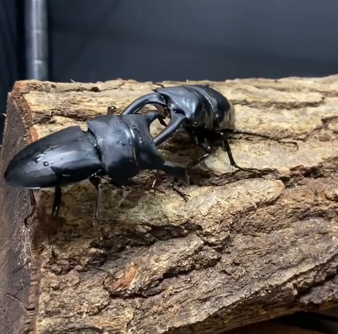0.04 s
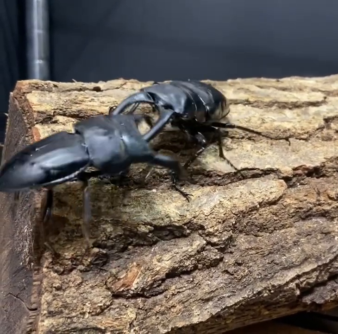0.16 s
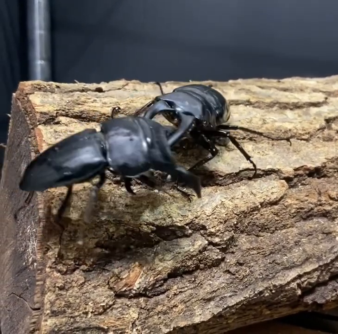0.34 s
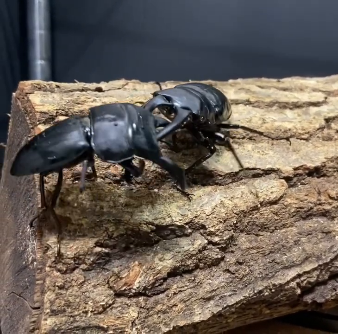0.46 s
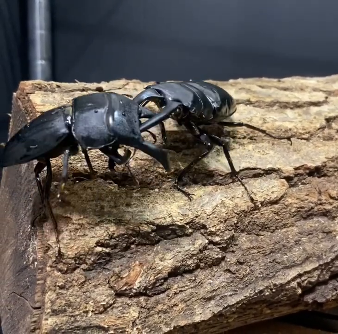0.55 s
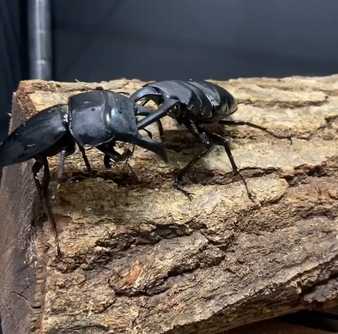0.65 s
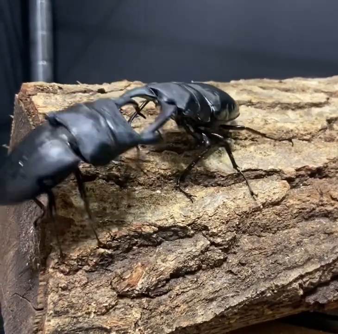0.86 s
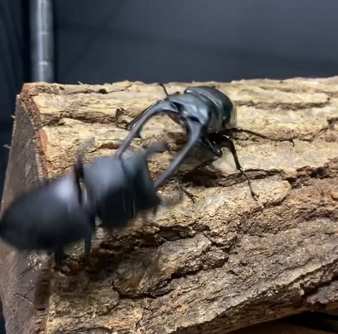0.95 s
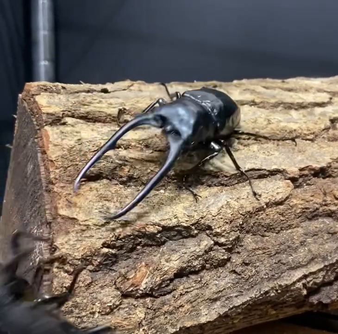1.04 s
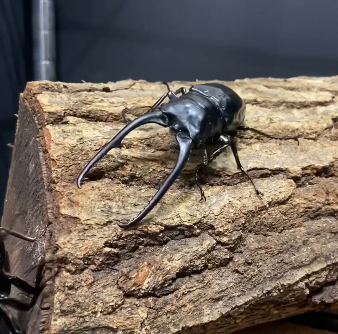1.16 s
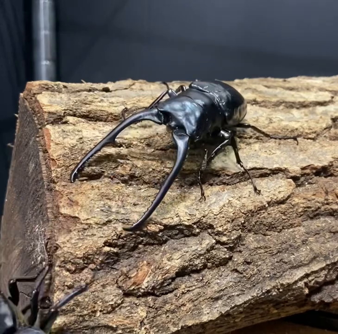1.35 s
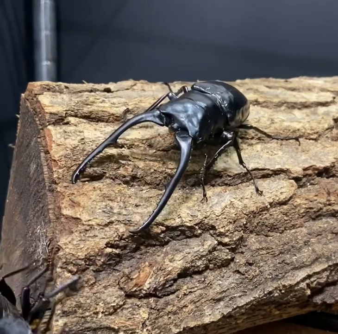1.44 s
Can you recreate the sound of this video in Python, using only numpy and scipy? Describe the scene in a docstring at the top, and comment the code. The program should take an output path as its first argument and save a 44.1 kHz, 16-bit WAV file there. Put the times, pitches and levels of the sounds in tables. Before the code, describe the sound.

Tiny dry clicks and scratches come from two large beetles wrestling on a log. One sharper snap early on gives way to scraping, then small hollow knocks and dull rubbing, close to the microphone in a quiet, faintly rumbling room.

```python
"""Tiny dry clicks over a low room rumble: two large stag beetles wrestle on a log in a quiet room,
close to a stereo microphone pair. Claws and jaws snap on the bark in bursts of fractures and scrape
across it, sticking and slipping, and bodies rub dully on the log. One beetle is thrown off and knocks
against the wood on its way down. The small room adds a short tail to every contact."""
import sys
import numpy as np
from scipy import signal
from scipy.fft import rfft, irfft, next_fast_len
from scipy.io import wavfile

SR = 44100
rng = np.random.default_rng(int(sys.argv[2]) if len(sys.argv) > 2 else 0)


def persist_wave(psi):
    """Save psi, clipped to +-1, as 16-bit WAV."""
    counts = np.round(np.clip(psi, -1, 1) * 32767).astype(np.int16)
    wavfile.write(sys.argv[1], SR, np.atleast_2d(counts).T)


N = 66150


def amp(db):
    """Decibels to gain."""
    return 10 ** (np.asarray(db) / 20)


def unit(x):
    """Scales to rms 1."""
    return x / np.sqrt(np.mean(x ** 2) + 1e-30)


def read(points, hz):
    """Reads a table on a log-frequency axis."""
    freqs, values = np.transpose(points)
    return np.interp(np.log(hz + 1), np.log(freqs + 1), values)


def add(mix, start_s, sound):
    """Adds a sound into the mix at its start time."""
    part = mix[max(round(start_s * SR), 0):][:len(sound)]
    part += sound[:len(part)]


def colour(x, points, size=2048):
    """Minimum-phase filter with the given spectrum: nothing rings ahead of an attack."""
    hz = abs(np.fft.fftfreq(size, 1 / SR))
    log_gain = np.log(amp(read(points, hz)))
    taps = np.fft.ifft(np.exp(np.conj(signal.hilbert(log_gain)))).real
    return signal.fftconvolve(x, taps[:size // 2])


def diffuse(pair):
    """Makes two unrelated signals as alike as diffuse sound is at the two microphones."""
    # Likeness of left and right: freq_hz, coherence
    likeness = [(60, .995), (130, .95), (300, .55), (700, .1), (4500, .15), (7000, .9), (16000, .85)]
    size = pair.shape[1]
    left, other = rfft(pair)
    coherence = read(likeness, np.fft.rfftfreq(size, 1 / SR))
    right = coherence * left + np.sqrt(1 - coherence ** 2) * other
    return irfft(np.array([left, right]), size)


def room_tone(rumble_db=-59.5):
    """Low rumble from all round the room, with a faint hum in it."""
    # Spectrum of the rumble: freq_hz, relative_db
    rumble_shape = [(18, -45), (32, -10.5), (48, -4), (80, 1), (120, -3.5), (165, -15.5), (270, -18.5),
                    (400, -30), (800, -36), (2000, -42.5), (5000, -44.5), (9000, -51.5), (16000, -54)]
    # Steady tones of the hum: pitch_hz, level_db
    hum_tones = [(80, -70), (98, -68), (120, -69)]
    gain = amp(read(rumble_shape, np.fft.rfftfreq(N, 1 / SR)))
    rumble = irfft(rfft(rng.standard_normal((2, N))) * gain, N)
    t = np.arange(N) / SR
    hum = sum(amp(db) * np.sqrt(2) * np.sin(2 * np.pi * (hz * t + rng.random())) for hz, db in hum_tones)
    return amp(rumble_db) * unit(diffuse(rumble)) + hum


def bark(drives, span_s, db, body_db, treble_db):
    """Bark fractures: a dry crack at db (rms over the span), with woody body and treble relative to it."""
    # Spectra of the three parts of a fracture: freq_hz, gain_db
    body = [(100, -26.5), (300, -9.5), (700, -6), (1200, -5), (1700, -1), (2350, 2.5), (3100, -4),
            (4500, -24.5), (9000, -48.5)]
    crack = [(500, -38), (2400, -17.5), (3400, -11), (4200, -4), (5100, 0.5), (6200, -8), (7500, -9),
             (11000, -20.5), (17000, -39)]
    treble = [(1000, -46), (5000, -12), (7000, -4.5), (8200, -3), (9200, -3.5), (11000, 0.5), (13000, 0.5),
              (14200, -4.5), (15600, -5), (17000, -22.5)]
    sound = 0
    for drive, spectrum, part_db in zip(drives, (body, crack, treble), (body_db, 0, treble_db)):
        part = colour(drive, spectrum)
        sound += amp(part_db) * part / (np.linalg.norm(part) + 1e-20)
    return amp(db) * np.sqrt(span_s * SR) * sound


def claw_clicks(rise_share=0.33, spread_db=4, size=1024):
    """A claw or jaw breaks loose: a burst of tiny fractures swells and dies within milliseconds."""
    # Snaps on the bark: start_s, length_s, level_db, body_db, treble_db
    snaps = [ (0.0133, .0011, -64, -6.5, -2), (0.0885, 0.0023, -52, 7, -8), (0.0984, 0.002, -53, 1.5, 1.5),
             (0.1667, 0.0028, -42, -7.5, -5.5), (0.1709, 0.0012, -49, 1.5, -1),
             (.2098, 0.0015, -50.5, 7, 5), (.2120, 0.0019, -35, -4.5, 3.5), (0.2132, 0.0019, -26.5, -12, 0),
             (0.2158, 0.0023, -41.5, -3, 7), (0.2726, 0.00046, -50, -11, -0.5),
             (0.312, 0.0016, -50.5, -2.5, -2), (0.3176, 0.0045, -50.5, -4, 1.5),
             (0.3427, 0.0006, -60.5, -4, 15.5), (0.3476, .0008, -61, -6, -9),
             (0.3562, 0.00076, -56.5, -10, -9), (0.371, 0.0027, -56.5, -14, -14),
             (0.3745, 0.0014, -62, -4, -6), (0.3875, 0.0012, -58.5, -10, -5),
             (0.4018, 0.00084, -54, -13, -7), (.4218, 0.0009, -57.5, -13, 0),
             (0.4267, 0.0012, -54.5, -2.5, -5), (0.4309, 0.0023, -45.5, -8, -7.5),
             (0.4445, .0026, -57, -6, 1), (0.45, 0.0014, -68, -1.5, -7), (0.4563, 0.00042, -58.5, -1.5, -3),
             (0.471, .0017, -63.5, -2, -8), (.5215, 0.0055, -60.5, -2, 0), (.5535, .002, -51, -4, -6.5),
             (.6475, 0.00071, -60.5, -6, -14), (.6714, 0.0014, -57, -5.5, 2), (.6750, 0.0014, -59, -7.5, 8),
             (0.7418, 0.0039, -52, -7, -1), (0.7464, 0.0018, -49.5, -12, 2.5),
             (.7604, 0.0017, -48, -2.5, 12.5), (0.764, 0.0028, -58, 3, 2), (0.795, 0.0012, -62.5, -12, -1),
             (0.8852, .002, -66.5, -4, -2), (0.9247, 0.0032, -55.5, -10, -4),
             (0.9274, 0.005, -56, -11, 2.5), (0.9429, .0025, -56, -15, 1.5),
             (.9528, 0.0012, -60.5, -2, 3.5), (1.007, 0.0059, -58.5, 5, -12),
             (1.0223, 0.0038, -59.5, -1, 5), (1.034, 0.0024, -61, -2, -4), (1.049, 0.0032, -63, 4, 2),
             (1.0584, 0.0038, -47.5, -2, -9), (1.0645, .0025, -53.5, 6, -10), (1.194, .003, -66.5, 5, -1),
             (1.2190, .003, -68, 1.5, 6.5), (1.3115, .006, -66, 5, -7.5), (1.4125, .004, -71.5, 4.5, -8)]
    out = np.zeros(N)
    for start_s, length_s, db, body_db, treble_db in snaps:
        age = np.arange(size) / SR / (length_s * rise_share)  # the swell peaks at 1
        burst = age * np.exp(-age) * amp(spread_db * rng.standard_normal(size))
        drives = burst * rng.standard_normal((3, size))
        add(out, start_s, bark(drives, span_s=0.004, db=db, body_db=body_db, treble_db=treble_db))
    return out


def stick_slip(length_s, db, grains_per_s=650, spread_db=3.5, hiss_gain=0.35, fade_share=0.25):
    """Stick-slip grains over a fine hiss, fading in and out; the firmer the stroke, the more it crackles."""
    progress = np.arange(0, length_s, 1 / SR) / length_s
    firmness = np.clip((db + 78) / 14, 0, 1)  # only hiss below -78 dB, full crackle 14 dB higher
    slips = rng.random(N) < grains_per_s / SR
    sizes = amp(spread_db * np.minimum(rng.exponential(1, N), 3))
    grains = unit(slips * sizes * rng.choice([-1, 1], (3, N)))
    drives = firmness * grains + hiss_gain * rng.standard_normal((3, N))
    fade = np.minimum(np.minimum(progress, 1 - progress) / fade_share, 1)
    return drives[:, :len(progress)] * fade


def bark_scrapes():
    """Stick-slip scrapes on the bark, and a faint dull rush just before the loudest snap."""
    # Scrapes on the bark, and the dull rush (second row): start_s, length_s, level_db, body_db, treble_db
    scrapes = [(0.073, 0.027, -77.5, 4, -6), (.185, 0.039, -69, 0, -28), (0.309, .085, -62.5, -3, -9),
               (.39, 0.087, -65.5, 0, -12), (0.481, 0.069, -83.5, 4.5, -4), (0.601, 0.056, -80, 0, -3),
               (.645, 0.087, -74, 2, -11), (.714, .045, -67, 2, -4), (0.766, 0.059, -71.5, 1, -5),
               (0.798, 0.071, -87, 13, -9), (0.894, 0.036, -74.5, -4, -2.5), (0.919, 0.085, -78, 4.5, 0.5),
               (1.025, .06, -66, 7, -5), (1.069, 0.052, -86, 10.5, 1), (1.166, 0.097, -79, 0.5, 2),
               (1.247, 0.052, -65, 1, -1.5), (1.285, 0.043, -70, 1, -2.5), (1.41, 0.081, -85, 8.5, -8.5)]
    out = np.zeros(N)
    for start_s, length_s, db, body_db, treble_db in scrapes:
        add(out, start_s, bark(stick_slip(length_s, db), length_s, db, body_db, treble_db))
    return out


def shell_knocks(rise_s=0.00084, mode_spacing=0.22, neighbour_db=-6.5, size=4096):
    """Shell on wood rings hollow: one main mode with a weaker, quicker neighbour on each side."""
    # Knocks on the log: start_s, pitch_hz, level_db, t60_s
    knocks = [(.0886, 1277, -47, 0.014), (.0888, 2126, -47, 0.013), (0.1718, 1610, -50.5, 0.015),
              (.2128, 250, -48, .014), (0.3124, 332, -56, 0.013), (1.0348, 2127, -40, 0.015),
              (1.0475, 2035, -57, 0.015), (1.0592, 2097, -43, .022), (1.0660, 2073, -40, 0.017),
              (1.0665, 703, -55, 0.034), (1.1945, 2104, -53, 0.015), (1.2255, 520, -59.5, 0.031),
              (1.3156, 850, -44, .022)]
    t = np.arange(size) / SR
    attack = 1 - np.exp(-t / rise_s)
    out = np.zeros(N)
    for start_s, hz, db, t60_s in knocks:
        fade = amp(-60 * t / t60_s)
        ratios = 1 + mode_spacing * rng.uniform(0.93, 1.24, 2) * [-1, 1]
        neighbours = sum(np.sin(2 * np.pi * (hz * ratio * t + rng.random())) for ratio in ratios)
        ring = np.sin(2 * np.pi * hz * t) + amp(neighbour_db) * np.sqrt(fade) * neighbours
        add(out, start_s, 2 * np.sqrt(2) * amp(db) * fade * attack * ring)
    return out


def body_rubs():
    """A body rubs on the log: stick-slip again, but dull and low."""
    # Rubs on the log: start_s, length_s, level_db
    rubs = [(.71, 0.049, -72), (.77, .13, -71), (.90, 0.16, -72), (1.048, 0.058, -65), (1.12, 0.18, -71),
            (1.265, 0.034, -60.5), (1.319, 0.048, -69), (1.401, 0.062, -71.5), (1.464, 0.046, -68)]
    # Spectrum of the rubbing: freq_hz, gain_db
    rub_shape = [(80, -15), (250, 7), (380, -4), (560, 0.5), (900, -2.5), (1500, -7.5), (2500, -20),
                 (8000, -44.5)]
    out = np.zeros(N)
    for start_s, length_s, db in rubs:
        friction = stick_slip(length_s, db)[0]
        add(out, start_s, amp(db) * unit(colour(friction, rub_shape)))
    return out


def room_reflections(close, early_db=-8.5, early_decay_s=0.004, size=22050):
    """Quick scatter from the log and the table, then the short tail of a small room."""
    # Decay of the room: freq_hz, t60_s
    decay_times = [(300, 0.16), (1800, 0.31), (5000, 0.16), (10000, 0.3), (16000, 0.05)]
    # Strength of the tail: freq_hz, level_db
    tail_levels = [(300, -5), (1800, -11), (5000, -10), (10000, -13.5), (16000, -12.5)]
    t = np.arange(size) / SR
    hz, frame_s, bands = signal.stft(rng.standard_normal((2, size)), SR, nperseg=256)
    t60_s = read(decay_times, hz)[:, None]
    bands *= amp(read(tail_levels, hz)[:, None] - 60 * frame_s / t60_s)
    bands *= np.sqrt(2 * np.log(1000) / (t60_s * SR))  # a longer decay adds no energy
    tail = signal.istft(bands, SR, nperseg=256)[1][:, :size] * np.minimum(t / 0.0045, 1)
    early = rng.standard_normal((2, size)) * np.exp(-t / early_decay_s) * np.minimum(t / 0.0014, 1)
    response = diffuse(tail + amp(early_db) * early / np.linalg.norm(early[0]))
    return signal.fftconvolve(close[None], response, axes=1)[:, :N]


def scene():
    """The beetles close up, with the room and its rumble behind them."""
    close = claw_clicks() + shell_knocks() + bark_scrapes() + body_rubs()
    return close + room_reflections(close) + room_tone()


def record(dry, cutoff_hz=16200):
    """The microphone pair: phase and level differ between left and right, and the top is cut off."""
    # Phase of left ahead of right: freq_hz, lead_rad
    phase_lead = [(200, 0), (500, -.9), (950, -1.4), (1400, 0), (2200, .8), (2900, 2.2), (3500, .8),
                  (4900, 0), (6000, 1.5), (6900, 3.05), (7800, 3.2), (9900, 6.2), (10800, 6.4),
                  (13000, 9.35), (14200, 9.5), (16000, 12.4)]
    # Level of left over right: freq_hz, balance_db
    balance = [(30, -1), (120, 3), (350, 4.5), (700, 1), (1600, -3), (2900, 1), (4200, -1.5), (6500, 1),
               (16000, -0.5)]
    size = next_fast_len(N + 4096)
    hz = np.fft.rfftfreq(size, 1 / SR)
    left = amp(read(balance, hz) / 2) * np.exp(0.5j * read(phase_lead, hz))  # half to each side
    pair = irfft(rfft(dry, size) * np.array([left, 1 / left]), size)[:, :N]
    lowpass = signal.firwin(255, cutoff_hz, window=("kaiser", 9), fs=SR)
    return signal.oaconvolve(pair, lowpass[None], "same")


dry = scene()
out = record(dry)
persist_wave(out)
```